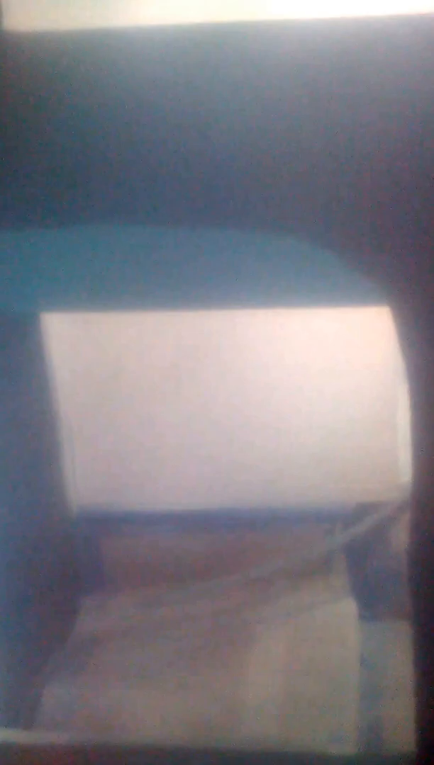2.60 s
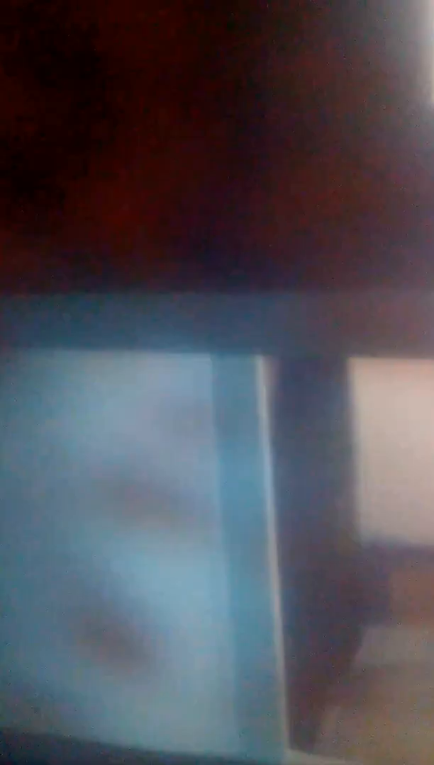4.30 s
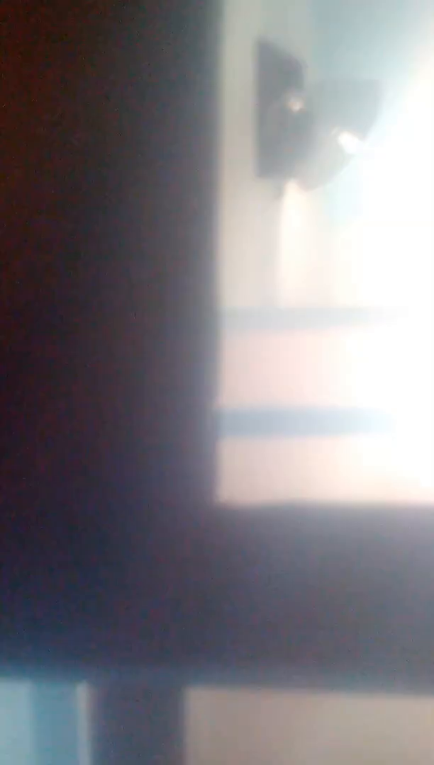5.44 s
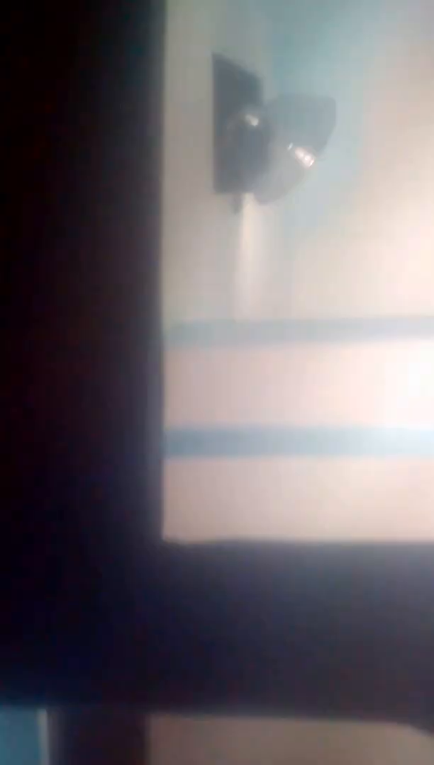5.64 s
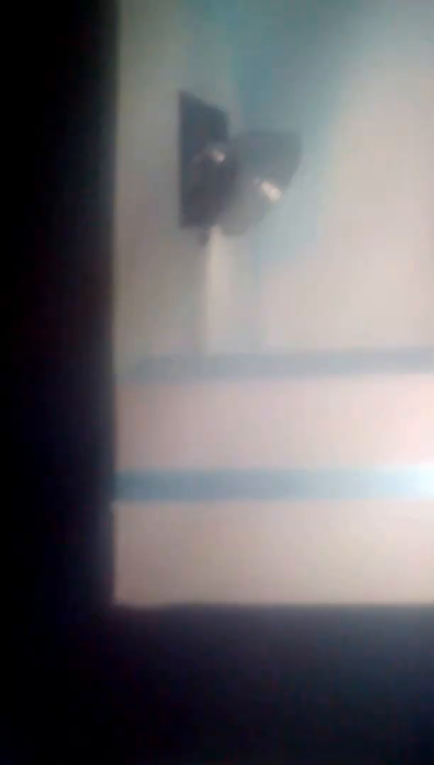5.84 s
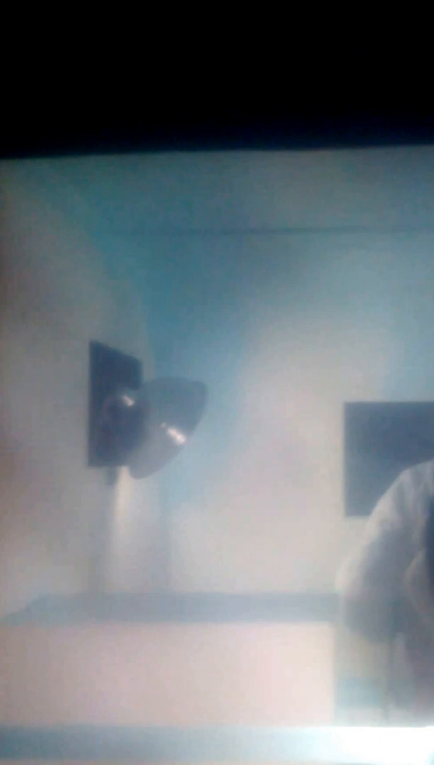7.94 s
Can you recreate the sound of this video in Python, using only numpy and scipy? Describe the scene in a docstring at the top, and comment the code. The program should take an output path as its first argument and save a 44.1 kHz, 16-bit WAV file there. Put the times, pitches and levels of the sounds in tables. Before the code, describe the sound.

In a small, slightly echoing room, faint clicks precede a brief burst of pressurised air, a pause, and a sustained soft hiss with a duller spatter under it. Then a compressor clicks on abruptly, clattering unevenly for about half a second with short rising rings, and runs on much louder: fast, regular knocking about eleven times a second, tank resonance, valve clatter and low hum. Close, modest microphone with softened highs.

```python
"""Over low room tone come faint handling ticks, then a spray gun hisses: one brief burst of shaped noise with
a thin whistle, then a second without pause. The belt-driven piston compressor that feeds it clicks on, a
ringing noise burst, and rattles up to speed, uneven noise with short gliding rings. Then it chugs: each crank
turn repeats the same tank ringing and puffs of air, shaken a little by the belt, over the sines of the motor."""
import sys
import numpy as np
from scipy import signal
from scipy.fft import rfft, irfft, next_fast_len
from scipy.io import wavfile
from scipy.ndimage import uniform_filter1d, map_coordinates

SR = 44100
rng = np.random.default_rng(int(sys.argv[2]) if len(sys.argv) > 2 else 0)


def pcm_store(signal):
    """Save signal as 16-bit PCM."""
    levels = np.round(np.clip(np.atleast_2d(signal), -1, 1) * 32767)
    wavfile.write(sys.argv[1], SR, levels.astype(np.int16).T)


def natural_amplitude(level_db):
    """Convert a level in decibels to a linear amplitude factor, elementwise."""
    exponent = np.asarray(level_db, float) / 20
    return 10 ** exponent


N = 397016  # samples
T = np.arange(N) / SR  # seconds


def evened(x):
    """Scales to rms 1."""
    return x / np.sqrt(np.mean(x ** 2) + 1e-20)


def curve(rows, column):
    """One column of a table over time, the first column being seconds."""
    rows = np.array(rows, float)
    return np.interp(T, rows[:, 0], rows[:, column])


def colour(x, spectrum):
    """Filters x by a spectrum drawn over log frequency, next to silent outside it, and scales to rms 1."""
    size = next_fast_len(N)
    f, db = np.transpose(spectrum)
    hz = np.fft.rfftfreq(size, 1 / SR)
    gain = natural_amplitude(np.interp(np.log(hz + 1), np.log(f + 1), db, left=-120, right=-120))
    return evened(irfft(rfft(x, size) * gain, size)[:N])


def air(spectrum, patchy_db):
    """Turbulent noise of rms 1 whose spectrum drifts in small patches."""
    a, b, patches = rng.standard_normal((N // 128 + 5, 257, 3)).T
    patches = uniform_filter1d(patches, size=8, axis=0)  # across frequency
    patches = evened(uniform_filter1d(patches, size=20, axis=1))  # across time
    cells = (a + 1j * b) * natural_amplitude(patchy_db * patches)
    noise = signal.istft(cells, nperseg=512, noverlap=384)[1][:N]
    return colour(noise, spectrum)


def resonate(x, hz, width):
    """A steep resonance of rms 1, width in Hz, that can follow a pitch curve."""
    turn = np.exp(2j * np.pi * np.cumsum(hz * np.ones(N)) / SR)
    r = np.exp(-np.pi * width / SR)
    # shift the pitch down to 0 Hz, smooth there, shift back
    smooth = signal.lfilter([1], [1, -2 * r, r * r], x / turn)
    return evened((turn * smooth).real)


def whistle(start, end, first_hz, last_hz, width, db):
    """A fuzzy gliding tone, resonant noise, that swells and fades between two moments."""
    way = np.clip((T - start) / (end - start), 0, 1)
    tone = resonate(rng.standard_normal(N), first_hz + way * (last_hz - first_hz), width)
    swell = np.sqrt(abs(np.sin(np.pi * way))) * (way < 1)
    return natural_amplitude(db) * swell * tone


# Trigger pulls. Each row: open in seconds, close in seconds, jet level in dB that it starts from,
# jet level in dB that it settles to.
TRIGGER_PULLS = [(0.811, 1.004, -35, -44.5), (1.278, 9.5, -40, -36.5)]
# Hiss of the jet at the nozzle. Each row: frequency in Hz, relative level in dB per Hz.
JET_SPECTRUM = [(1410, -35), (2400, -14), (2600, -17), (2880, -14), (4050, -2.5), (4420, -3), (5670, -0.5),
                (6990, -4), (7320, -7.5), (8100, -18.5), (10500, -53.5), (17800, -120)]
# Duller splash on the wall. Each row: frequency in Hz, relative level in dB per Hz.
SPLASH_SPECTRUM = [(260, -33), (450, -8), (566, -14.5), (611, -0.5), (723, -4), (1140, 0.5), (1410, -1),
                   (1880, 0.5), (2800, -14), (3640, -38), (6160, -120)]
# Thin whistle in the first burst. One row: start in seconds, end in seconds, first pitch in Hz,
# last pitch in Hz, width in Hz, level in dB at the top of its swell.
NOZZLE_WHISTLE = (.82, .99, 2170, 2170, 12, -51)
OPEN_S, SETTLE_S, CLOSE_S = 0.0081, 1, 0.041  # time constants of the valve and its flow
LEAK_DB = -57.5  # dribble of the valve, there from the first pull on
SPLASH_DB, SPLASH_LAG_DB, SPLASH_BUILD_S = -8, -6.5, 0.34  # relative to the jet; it builds after opening


def gun():
    """The valve drives turbulent air at the nozzle, and a splash on the wall that builds up later."""
    jet, splash = natural_amplitude(LEAK_DB) * (T > TRIGGER_PULLS[0][0]), np.zeros(N)
    for opened, closed, first_db, settled_db in TRIGGER_PULLS:
        age = np.maximum(T - opened, 0)
        opening = (1 - np.exp(-age / OPEN_S)) ** 2
        closing = np.exp(-np.maximum(T - closed, 0) / CLOSE_S)
        flow_db = settled_db + (first_db - settled_db) * np.exp(-age / SETTLE_S)
        flow = opening * closing * natural_amplitude(flow_db)
        jet = jet + flow
        splash = splash + flow * natural_amplitude(SPLASH_DB + SPLASH_LAG_DB * np.exp(-age / SPLASH_BUILD_S))
    hiss = jet * air(JET_SPECTRUM, patchy_db=0.73)
    spatter = splash * air(SPLASH_SPECTRUM, patchy_db=1.0)
    return hiss + spatter + whistle(*NOZZLE_WHISTLE)


CRANK_PER_S, BELT_PER_S = 11.3125, 4.625  # turns per second
BELT_WOBBLE = .0024  # crank turns by which the belt joint pulls it early and late


def crank():
    """Crank turns over time: steady speed plus a small sway at the rate of the belt."""
    return CRANK_PER_S * T + BELT_WOBBLE * np.sin(2 * np.pi * (BELT_PER_S * T + rng.random()))


def replay(one_turn, turns):
    """Reads the sound of one crank turn over and over, following the crank angle."""
    return map_coordinates(one_turn, [turns % 1 * len(one_turn)], order=1, mode="grid-wrap")


# Valve and piston knocks in every turn. Each row: crank angle in turns, signed strength (push or pull).
KNOCKS = [(0.1726, 0.14), (0.4406, 0.21), (0.6024, -0.19), (0.7222, -0.33), (0.8015, 0.32), (0.8715, 0.1),
          (0.8906, 0.35)]
# Tank and frame modes. Each row: frequency in Hz, gain at resonance in dB before the trims below,
# ring time t60 in seconds.
TANK_MODES = [(79.5, -29.7, .09), (148.5, -25.3, .29), (207.8, -28.1, .7), (297.9, -31.5, .7),
              (339.6, -23.6, .7), (348.8, -19.8, .48), (384.0, -32.1, .22), (421.0, -11.0, .7),
              (481.7, -32.2, .2), (550.8, -34.5, .08), (603.2, -19.3, .7), (648.7, -28.4, .7),
              (691.9, -13.8, .4), (719.6, -23.3, .3), (769.7, -31.6, .7), (781.5, -28.3, .65),
              (813.0, -38.4, .7), (896.9, -38.9, .7), (951.1, -31.2, .7), (981.6, -26.4, .37),
              (1032.3, -45.0, .7)]
TANK_LOW_HZ = 110  # below this the tank radiates little
TONES_DB = 0.46  # trim of the ringing
WAVER_DB, WAVER_S = 1.2, .3  # groups of tones waver slowly, each on its own
CREEP_DB_PER_S, CREEP_ZERO_S = .6, 6.6  # growth of the upper tones, and the moment when it is 0 dB


def tank_tones(turns):
    """The same knocks every turn ring the tank at multiples of the crank rate."""
    size = round(SR / CRANK_PER_S)
    order = np.arange(4, 100)
    hz_of_order = order * CRANK_PER_S
    # half the width of a mode in Hz is 1.1 / t60
    modes = sum(natural_amplitude(db) / (1 + 1j * (hz_of_order - hz) * t60 / 1.1) for hz, db, t60 in TANK_MODES)
    blows = sum(push * np.exp(-2j * np.pi * order * at) for at, push in KNOCKS)
    lines = modes * blows / (1 + (TANK_LOW_HZ / hz_of_order) ** 4)
    waves = np.exp(2j * np.pi * np.outer(order, np.arange(size)) / size)
    partials = (lines[:, None] * waves).imag
    groups = partials.reshape(16, -1, size).sum(1)  # 16 groups of neighbouring tones
    knots = np.arange(0, T[-1] + WAVER_S, WAVER_S)
    waver_db = WAVER_DB * rng.standard_normal((len(groups), len(knots)))
    upper = np.clip(np.arange(len(groups)) / 8 - .5, 0, 1)
    creep_db = CREEP_DB_PER_S * np.outer(upper, knots - CREEP_ZERO_S)
    levels_db = waver_db + creep_db
    tones = sum(natural_amplitude(np.interp(T, knots, db)) * replay(turn, turns) for db, turn in zip(levels_db, groups))
    return natural_amplitude(TONES_DB) * tones


VALVE_OPENS_TURNS = .66  # crank angle
RUSH_DB, RUSH_TURNS, RUSH_RISE_TURNS = 6.5, .45, .08  # air rushes once a turn and dies away
SPIT_DB, SPIT_TURNS = 3., .03  # a short spit at each knock, scaled by its strength
UNEVEN_DB = 1.3  # no two rushes are equally strong


def air_puffs(turns):
    """Strength of the air flow: a rush as the valve opens and a spit at each knock."""
    angle = turns % 1
    strengths = natural_amplitude(UNEVEN_DB * rng.standard_normal(int(turns.max()) + 3))
    uneven = strengths[np.floor(turns - VALVE_OPENS_TURNS).astype(int) + 1]
    since = (angle - VALVE_OPENS_TURNS) % 1
    rush = (1 - np.exp(-since / RUSH_RISE_TURNS)) * np.exp(-since / RUSH_TURNS)
    spits = sum(abs(push) * np.exp(-((angle - at) % 1) / SPIT_TURNS) for at, push in KNOCKS)
    return 1 + natural_amplitude(RUSH_DB) * uneven * rush + natural_amplitude(SPIT_DB) * spits


# Valves and air. Each row: frequency in Hz, relative level in dB per Hz.
CLATTER_SPECTRUM = [(710, -2.5), (1200, -2.5), (1380, -2.5), (2130, -2), (2340, -5), (3130, -5),
                    (3460, -8.5), (4290, -11), (5780, -9), (7500, -27.5), (9750, -48.5), (16500, -120)]
CLATTER_DB = -24.5  # rms before load, surge and creep
REPEATED = .45  # share of the clatter's power that is alike in every turn
VALVES_DB, VALVE_SURGE_DB, VALVE_SURGE_S = -1, 13.5, 0.1  # trim; the valves surge first


def valve_clatter(turns, puffs):
    """Noise, partly the same in every turn, is pumped by the puffs; it surges, then creeps up."""
    alike = replay(rng.standard_normal(round(SR / CRANK_PER_S)), turns)
    grit = np.sqrt(REPEATED) * alike + np.sqrt(1 - REPEATED) * rng.standard_normal(N)
    clatter = natural_amplitude(CLATTER_DB) * colour(puffs * grit, CLATTER_SPECTRUM)
    surge_db = VALVE_SURGE_DB * np.exp(-np.maximum(T - LOAD_AT_S, 0) / VALVE_SURGE_S)
    creep_db = .5 * CREEP_DB_PER_S * (T - CREEP_ZERO_S)
    return natural_amplitude(VALVES_DB + creep_db + surge_db) * clatter


# Frame noise between the tones. Each row: frequency in Hz, relative level in dB per Hz.
RUMBLE_SPECTRUM = [(25, -30), (60, -18), (100, -11), (150, -8), (230, -12), (340, -2), (450, 0), (560, -2),
                   (750, 0), (890, -7), (1000, -4), (1300, -12), (1600, -36)]
RUMBLE_DB = -27  # before puffs and load


def frame_rumble(puffs):
    """Low noise of the frame that breathes very slightly with the puffs."""
    return natural_amplitude(RUMBLE_DB) * puffs ** 0.033 * air(RUMBLE_SPECTRUM, patchy_db=1.0)


LOAD_AT_S, LOAD_FROM_DB, LOAD_S = 4.84, -21., .075  # start, level at the start, time constant


def pump_load():
    """The pump takes load: silent before, its level then closes in from below."""
    age = np.maximum(T - LOAD_AT_S, 0)
    return natural_amplitude(LOAD_FROM_DB * np.exp(-age / LOAD_S)) * (age > 0)


# Motor shaft, mains hum and their mixtures with the crank. Each row: frequency in Hz,
# level in dB rms at full load.
MOTOR_TONES = [(57.67, -43), (102.89, -47), (119.95, -48), (173.03, -54), (205.81, -49), (206.97, -52),
               (281.67, -51), (283.91, -50)]


def motor():
    """Steady sines, each from a random phase."""
    return sum(np.sqrt(2) * natural_amplitude(db) * np.sin(2 * np.pi * (hz * T + rng.random())) for hz, db in MOTOR_TONES)


# Start of the compressor. Each row: time in seconds, rattle level in dB before the closing fade,
# level of the treble relative to the rattle in dB.
RUN_UP = [(4.397, -38, 3.5), (4.474, -28.5, -9), (4.51, -22, -0.5), (4.55, -19, -2), (4.622, -18, -5.5),
          (4.752, -23, -8), (4.862, -22, -10), (4.902, -30.5, 1), (4.92, -20.5, -9), (5.05, -13, -12)]
# Body of the rattle. Each row: frequency in Hz, relative level in dB per Hz.
RATTLE_SPECTRUM = [(35, -66), (60, -17.5), (319, -9), (375, -10.5), (497, -4), (651, -6), (735, 1),
                   (887, -10), (975, -5.5), (1500, -14.5), (1950, -34), (3300, -120)]
# Treble of the rattle. Each row: frequency in Hz, relative level in dB per Hz.
SCRAPE_SPECTRUM = [(1200, -23.5), (1500, 0), (2000, 1), (3000, -7.5), (5500, -5.5), (7000, -9), (8000, -37),
                   (8300, -45)]
# Tank shell ringing and belt squeal. Each row: start in seconds, end in seconds, first pitch in Hz,
# last pitch in Hz, width in Hz, level in dB at the top of its swell.
RINGS = [(4.395, 4.5, 490, 490, 22, -34), (4.5, 4.7, 730, 745, 25, -25), (4.54, 4.68, 460, 520, 40, -29),
         (4.64, 4.78, 2300, 2680, 450, -29)]


def run_up():
    """The starting motor shakes the frame with dense uneven clacks; tank and belt sing briefly."""
    jumps_db = 0.94 * np.minimum(rng.exponential(1, N // 60 + 1), 3)
    clacks = rng.standard_normal(N) * natural_amplitude(jumps_db).repeat(60)[:N]  # a new level every 60 samples
    scrape = natural_amplitude(curve(RUN_UP, column=2)) * colour(clacks, SCRAPE_SPECTRUM)
    fade = np.clip((RUN_UP[-1][0] - T) / 0.15, 0, 1) * (T > RUN_UP[0][0])  # the pump takes over
    shake = natural_amplitude(curve(RUN_UP, column=1)) * fade * (colour(clacks, RATTLE_SPECTRUM) + scrape)
    return shake + sum(whistle(*ring) for ring in RINGS)


# The switch closing, then the starting contact dropping out. Each row: start in seconds,
# level in dB rms at the start, ring in Hz, decay time t60 in seconds.
SWITCH_CONTACTS = [(4.399, -25, 5750, 0.16), (4.874, -21, 5500, 0.16)]


def switch():
    """Each contact gives a short bright buzz of spring steel: resonant noise that dies away."""
    out = np.zeros(N)
    for s, db, hz, t60 in SWITCH_CONTACTS:
        decay = natural_amplitude(db - 60 * np.maximum(T - s, 0) / t60) * (T >= s)
        out += decay * resonate(rng.standard_normal(N), hz, width=2600.)
    return out


# Faint handling ticks before the first burst. Each row: start in seconds, level in dB rms at the start.
HANDLING_TICKS = [(.03, -55), (.049, -53.5), (.125, -62.5), (.241, -56), (.375, -50.5), (0.419, -57),
                  (.5, -62), (.685, -52), (.732, -55)]


def ticks():
    """Short dry puffs of wide noise, each with a t60 of 0.04 s."""
    decay = sum(natural_amplitude(db - 60 * np.maximum(T - s, 0) / .04) * (T >= s) for s, db in HANDLING_TICKS)
    return decay * resonate(rng.standard_normal(N), 5000., width=2800.)


# Low room tone. Each row: frequency in Hz, relative level in dB per Hz.
ROOM_SPECTRUM = [(25, -34), (45, 0), (110, -4), (150, -8.5), (210, -8), (400, -12.5), (1000, -17),
                 (2700, -25.5), (3600, -26), (6500, -26.5), (7600, -40), (8100, -49.5)]
# A faint steady whine. Each row: frequency in Hz, level in dB rms.
ROOM_WHINE = [(3499, -74)]
ROOM_DB = -50  # rms of the room tone


def room():
    """Low noise with a thin sine whine."""
    whine = sum(np.sqrt(2) * natural_amplitude(db) * np.sin(2 * np.pi * hz * T) for hz, db in ROOM_WHINE)
    return natural_amplitude(ROOM_DB) * air(ROOM_SPECTRUM, patchy_db=0.5) + whine


ECHO_DB, ECHO_T60 = -8, .3  # room echo against the direct sound, its decay in seconds


def echoed(x):
    """Direct sound plus a dying noise tail, which leaves fixed fine ripples in the spectrum."""
    t = np.arange(SR // 2) / SR
    tail = rng.standard_normal(len(t)) * natural_amplitude(-60 * t / ECHO_T60) * (t > .004)
    tail *= natural_amplitude(ECHO_DB) / np.linalg.norm(tail)
    tail[0] = 1  # direct sound
    return signal.oaconvolve(x, tail / np.linalg.norm(tail))[:N]


def scene():
    """Gun, starting noises and valves echo in the room; pump body, motor, ticks and room tone stay dry."""
    turns = crank()
    puffs = air_puffs(turns)
    load = pump_load()
    body = load * (tank_tones(turns) + frame_rumble(puffs) + motor())
    valves = load * valve_clatter(turns, puffs)
    in_room = echoed(gun() + run_up() + switch() + valves)
    return (room() + ticks() + body + in_room)[None]


def top_cut(x):
    """Nothing passes above the cut-off."""
    return signal.sosfilt(signal.butter(12, 10060, fs=SR, output="sos"), x)


# Leak of the mirrored band. Each row: frequency in Hz, level in dB relative to the band it mirrors.
MIRROR_LEAK = [(8000, -2.5), (8500, -7), (9000, -15.5), (9500, -25.5), (10000, -37), (10400, -74)]
CONVERTER_HZ = 16000  # sampling rate


def record(dry):
    """A slow converter: above half its rate only a fading mirror of the band below is left."""
    size = next_fast_len(N)
    z, hz = rfft(dry, size), np.fft.rfftfreq(size, 1 / SR)
    fold = round(CONVERTER_HZ / 2 * size / SR)
    above = np.arange(fold, 2 * fold)
    leak = natural_amplitude(np.interp(hz[above], *np.transpose(MIRROR_LEAK), right=-140))
    z[:, above] = np.conj(z[:, 2 * fold - above]) * leak
    z[:, 2 * fold:] = 0
    return top_cut(irfft(z, size)[:, :N])


dry = scene()
out = record(dry)
pcm_store(out)
```